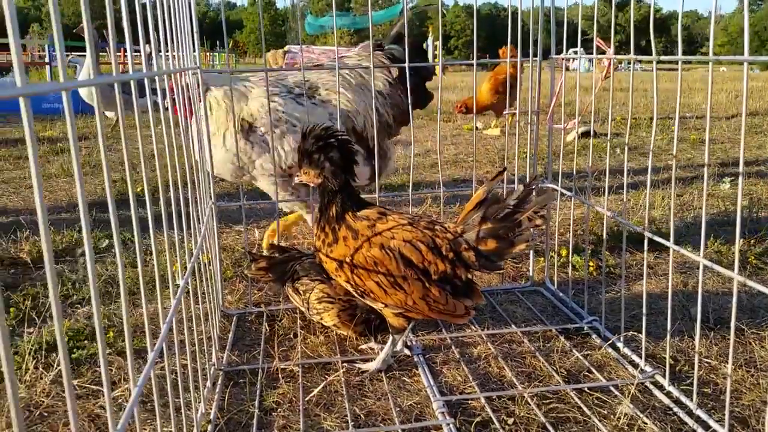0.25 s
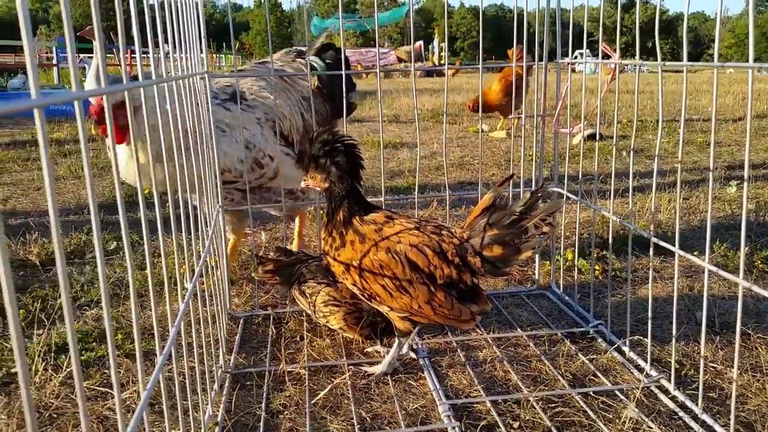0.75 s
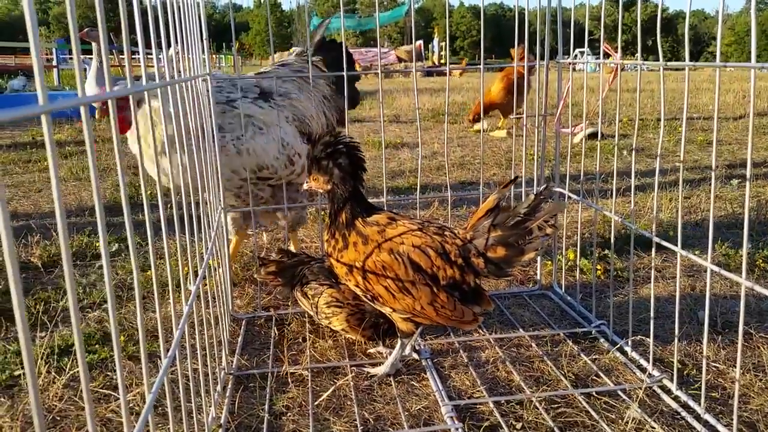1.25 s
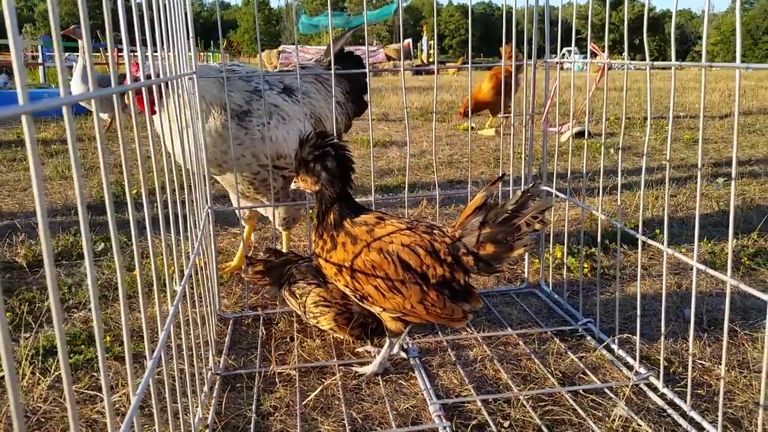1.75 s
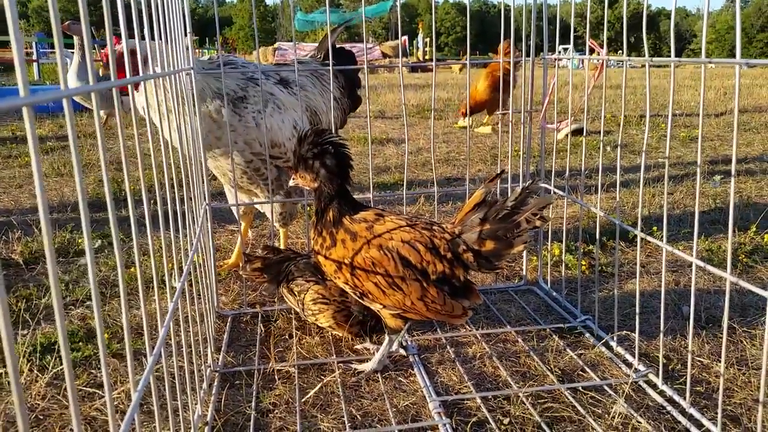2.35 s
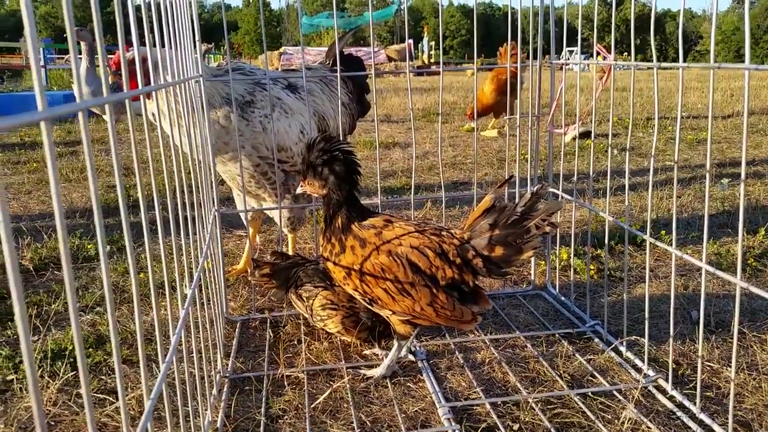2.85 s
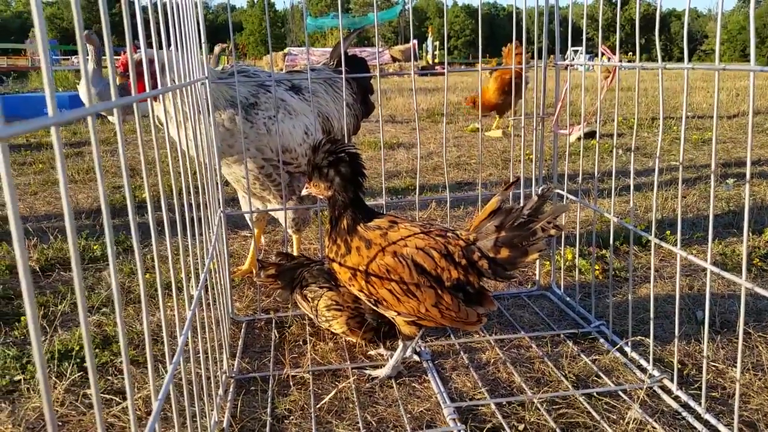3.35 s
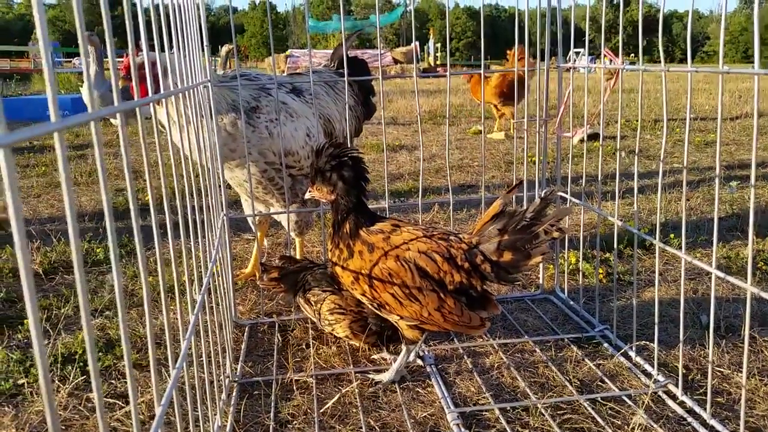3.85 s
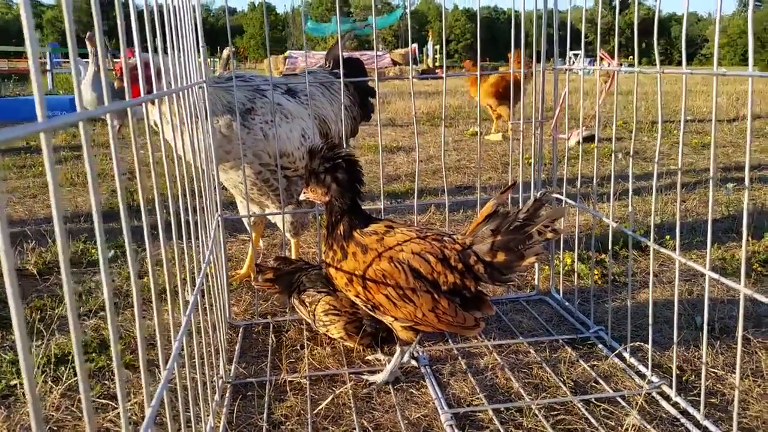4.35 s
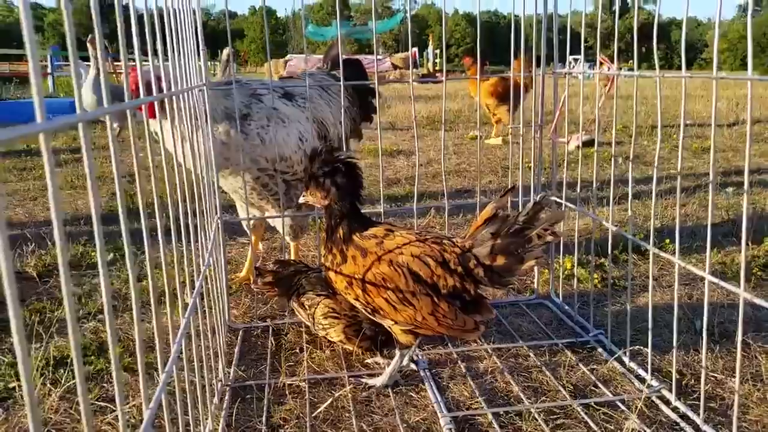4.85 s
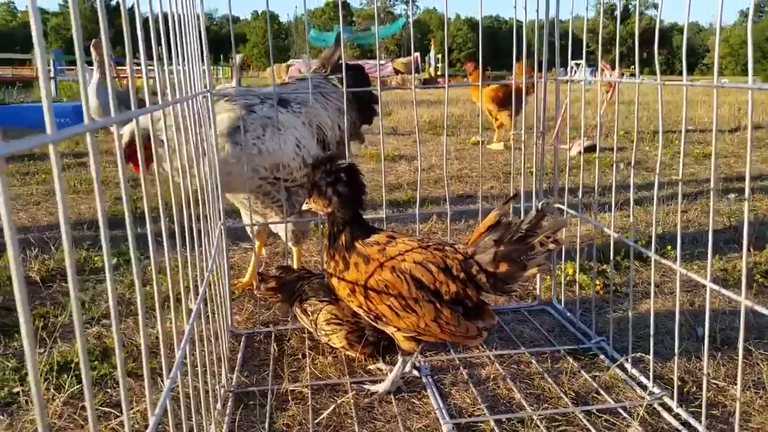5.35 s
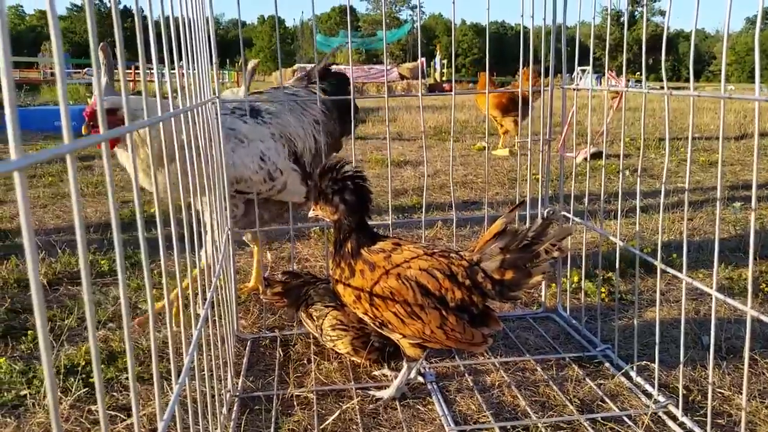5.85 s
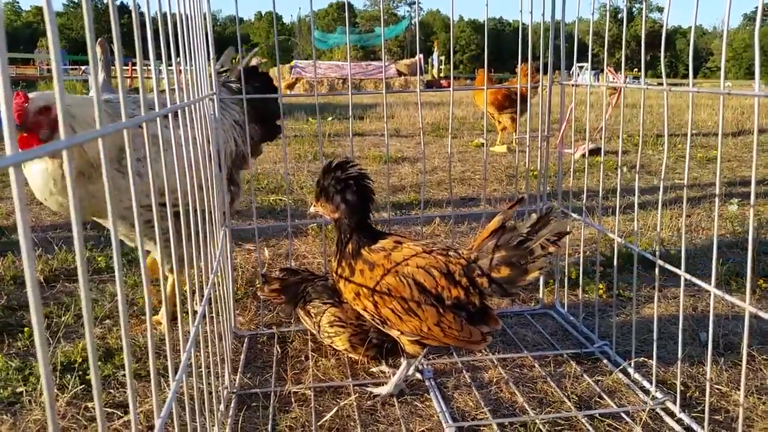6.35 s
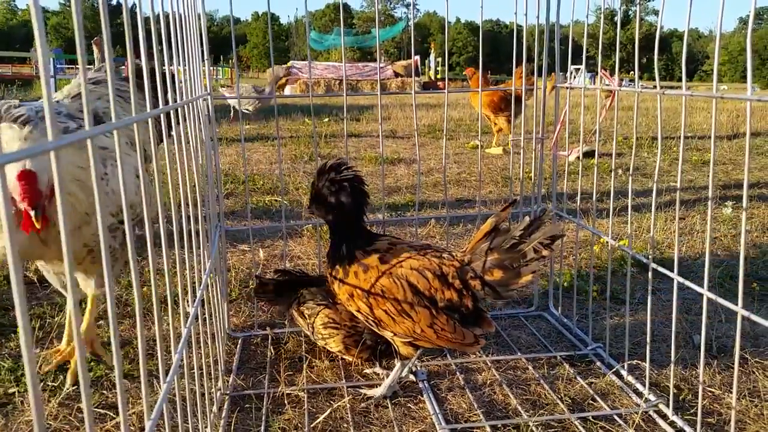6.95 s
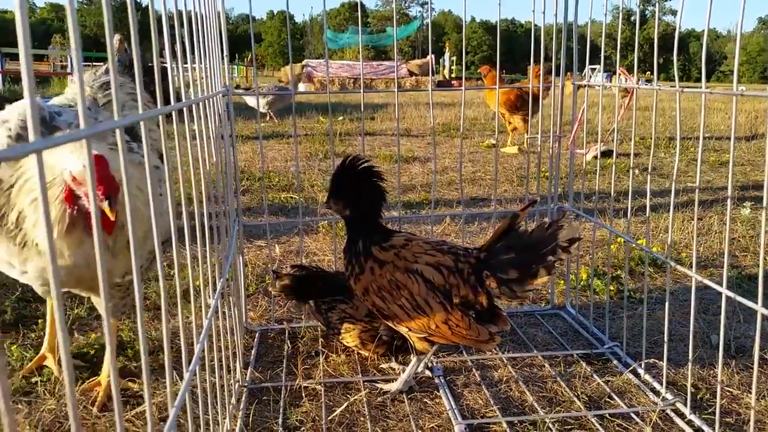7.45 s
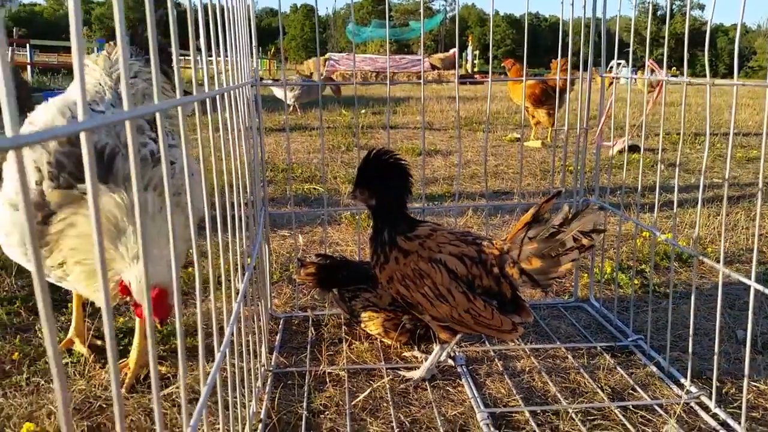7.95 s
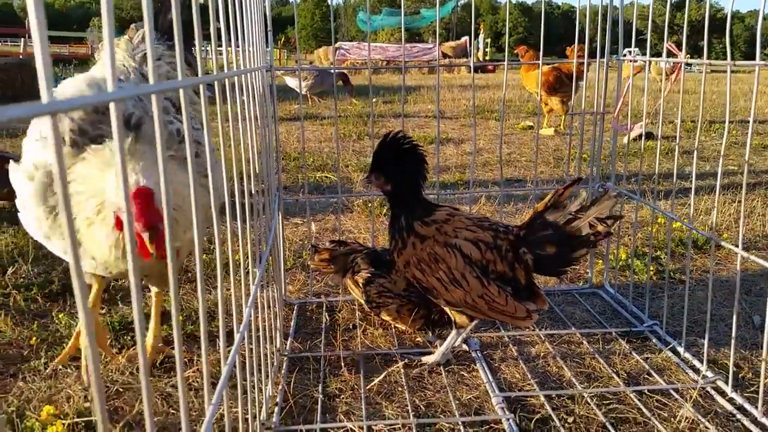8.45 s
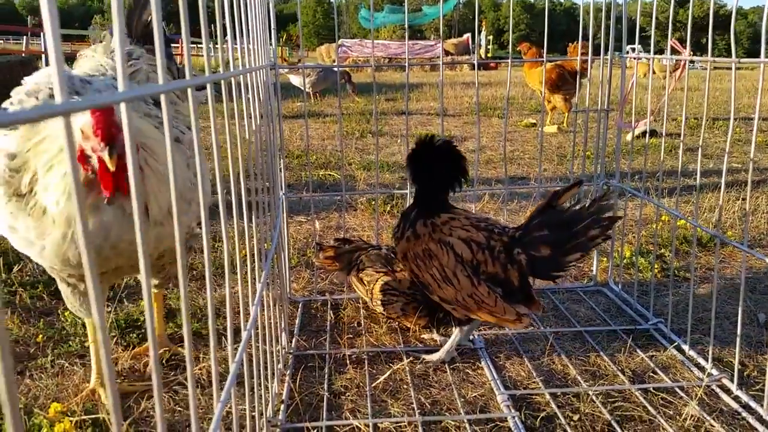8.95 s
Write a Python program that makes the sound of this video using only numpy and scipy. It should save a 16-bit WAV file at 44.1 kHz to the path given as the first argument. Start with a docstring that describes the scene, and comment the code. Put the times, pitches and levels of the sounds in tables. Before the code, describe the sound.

Open summer field beside a wire pen, microphone close to the birds. Soft low breeze, a high insect chorus, fast cricket trills with brief gaps and faint katydid buzzes about twice a second continue throughout; a faint far engine slowly sinks in pitch, clearer after 6.5 s. A rooster gives tiny low throaty clucks at 0.05 and 0.9 s. A second bird, slightly further away, makes quick soft clucking runs at 1.4-2.0, a quieter one at 3.1-3.5, and a stronger one at 4.7-5.3 s, rising and closing with a small squeak. A hard dull knock strikes the microphone at 4.2 s. The rooster clucks at 5.9, 6.95 and 7.55 s; the last run comes at 6.9-7.4 s. Dry grass crackles lightly, mainly around 7 s and 8.7-9.1 s, and low bumps cluster from 6.3 s, stronger at 8.4 s. The loudest, sharpest cluck comes at 8.7 s.

```python
"""A light breeze and insects in the grass of a summer field, and at once a low cluck from a rooster close by at a wire pen.
Filtered noise makes the breeze and the insect chorus, swept tones the crickets, noise in a narrow band a katydid,
and one wavering tone a far engine that sinks in pitch. The rooster's clucks are a few throat pulses each;
a second bird a little further off answers with four quick runs of soft notes, made of harmonics and breath.
Steps crackle in dry grass, and later a few bumps reach the microphone."""
import sys
import numpy as np
from scipy import signal
from scipy.fft import rfft, irfft, next_fast_len
from scipy.io import wavfile
from scipy.ndimage import uniform_filter1d

SR = 44100
rng = np.random.default_rng(int(sys.argv[2]) if len(sys.argv) > 2 else 0)


def put_to_file(sound):
    """Save the sound as 16-bit audio at rate SR, in the file named by the first command-line argument."""
    columns = np.atleast_2d(sound).T  # one column per channel
    safe = np.clip(columns, -1, 1)
    whole_steps = np.round(safe * 32767)
    wavfile.write(sys.argv[1], SR, whole_steps.astype(np.int16))


N = 405860  # samples, 9.2 s

# The high insect hiss over time, which the katydid's buzzes follow. Each row: time in seconds, level in dB.
HISS_LEVEL = [(0, -81.3), (1.9, -81.8), (2.85, -88.3), (3.6, -85), (5.6, -83.3), (6.2, -85.5), (7.3, -78.8),
              (8.35, -84.3), (8.8, -79.5)]


def gain_of(db):
    """Amplitude factor for a level in dB."""
    return 10 ** (np.asarray(db) / 20)


def evened(x):
    """Scales to rms 1."""
    return x / np.sqrt(np.mean(x ** 2) + 1e-20)


def read(points, hz):
    """A spectrum's value at hz, on a log-frequency axis."""
    f, value = np.transpose(points)
    return np.interp(np.log(hz + 1), np.log(f + 1), value)


def curve(rows, order=1):
    """One column of a time table at every sample."""
    rows = np.asarray(rows)
    return np.interp(np.arange(N) / SR, rows[:, 0], rows[:, order])


def panned(x, side_db):
    """Two channels from one, the left louder by side_db."""
    return x * gain_of([[side_db / 2], [-side_db / 2]])


def add(mix, s, sound):
    """Lays a stereo sound into the mix from s seconds on."""
    part = mix[:, max(round(s * SR), 0):][:, :sound.shape[1]]
    part += sound[:, :part.shape[1]]


def wander(hz, size=N):
    """Slow chance of rms 1, up to about hz."""
    n = next_fast_len(size + SR, True)
    f = np.fft.rfftfreq(n, 1 / SR)
    slow = irfft(rfft(rng.standard_normal(n)) / (1 + (f / hz) ** 4), n)
    return evened(slow)[:size]


def coloured(x, colour, size=4096):
    """Causal (minimum-phase) filter whose gain in dB is colour(hz)."""
    hz = abs(np.fft.fftfreq(size, 1 / SR))
    log_gain = np.log(gain_of(colour(hz)))
    ring = np.fft.ifft(np.exp(np.conj(signal.hilbert(log_gain)))).real
    return signal.fftconvolve(x, ring[:size // 2])


def wash(spectrum, likeness, side_db, patchy_db, size=1024):
    """Stereo noise with drifting patches; the mean of both channels has rms 1."""
    hz = np.fft.rfftfreq(size, 1 / SR)
    a, b, c, d, patches = rng.standard_normal((5, N * 4 // size + 5, len(hz)))
    patches = uniform_filter1d(patches, size=6, axis=0)  # over time
    patches = evened(uniform_filter1d(patches, size=7, axis=1))  # over frequency
    same = np.clip(likeness, -1, 1)
    left = a + 1j * b
    right = same * left + np.sqrt(1 - same ** 2) * (c + 1j * d)
    z = np.array([left, right])
    z *= gain_of(read(spectrum, hz) + patchy_db * patches)
    side = side_db(hz) / 2
    z *= gain_of(np.array([side, -side]))[:, None]
    x = signal.istft(z.transpose(0, 2, 1), nperseg=size, noverlap=size - size // 4)[1][:, :N]
    return x / x.mean(0).std()


def yard(x, wet_db, t60):
    """Weak scattered echoes from the ground, the pen and the birds."""
    t = np.arange(SR // 2) / SR
    signs = rng.choice([-1., 1.], (2, len(t)))
    sparse = rng.random((2, len(t))) < 2500 / SR  # 2500 echoes per second
    taps = signs * sparse * (t > .003) * gain_of(-60 * t / t60)
    taps = taps + .5 * taps[::-1]  # each side hears some of the other
    echoes = signal.fftconvolve(x, taps / np.linalg.norm(taps[0]), axes=1)[:, :N]
    return x + gain_of(wet_db) * echoes


def field():
    """Breeze, far insect chorus and high hiss: three noises, each with its own spectrum and slow level."""
    # Spectra of the three. Each row: frequency in Hz, relative level in dB per Hz.
    breeze_spectrum = [(15, -16.5), (30, -1), (55, 0), (110, -2.5), (170, -9.5), (280, -15.5), (400, -19),
                       (600, -24), (1000, -33.5), (1600, -40.5), (2500, -46.5), (4000, -52.5), (7000, -72),
                       (15000, -82)]
    chorus_spectrum = [(2400, -25.5), (3100, -17), (3750, -12), (4050, -4), (4700, 1.5), (5100, -4.5),
                       (5600, -15.5), (6200, -41.5), (7000, -93)]
    hiss_spectrum = [(6500, -21), (8800, -18.5), (9700, -2.5), (10800, -8.5), (12000, 0.5), (13200, 1.5),
                     (14000, -4), (14700, -23), (15600, -17)]
    # Breeze and chorus over time. Each row: time in seconds, level in dB.
    breeze_level = [(0, -52), (1.6, -53.8), (2.9, -54.7), (5.1, -53.2), (6, -54.7), (6.8, -52), (9.2, -53)]
    chorus_level = [(0, -67), (.7, -66.8), (2.5, -72), (4.8, -71.5), (5.15, -69.5), (6.1, -73.5),
                    (7.5, -67.8), (8.2, -70.8), (9.2, -69.8)]
    breeze_side = [(60, 7.7), (120, 11.8), (380, 3.3), (2000, 2)]  # (Hz, left-right dB)
    breeze = wash(breeze_spectrum, 0.36, lambda f: read(breeze_side, f), patchy_db=2.0, size=2048)
    chorus = wash(chorus_spectrum, 0.2, lambda f: 8 + 0 * f, patchy_db=1.33)
    hiss = wash(hiss_spectrum, 0.18, lambda f: 2 + 0 * f, patchy_db=1)
    low = breeze * gain_of(curve(breeze_level))
    return low + chorus * gain_of(curve(chorus_level)) + hiss * gain_of(curve(HISS_LEVEL))


def engine(start_hz=570, sink_octaves_per_s=.042):
    """One far tone that sinks steadily in pitch, wavering in pitch and level."""
    # The far engine over time. Each row: time in seconds, peak level in dB ahead of the wavering.
    drone_level = [(0, -79.5), (1.6, -82), (4.3, -75.5), (5.8, -76), (6.5, -68), (9.2, -68.7)]
    sinking = start_hz * 2 ** (-sink_octaves_per_s * np.arange(N) / SR)
    hz = sinking * (1 + 0.0091 * wander(16.8))
    tone = np.sin(2 * np.pi * np.cumsum(hz) / SR)
    return panned(tone * gain_of(curve(drone_level)) * (1 + .5 * wander(9)), side_db=4)


def wing_strokes(strokes, top_hz, sag_hz, width):
    """The wing sweeps once a stroke; its tone swells, arches with the speed of the file, sinks and stops."""
    u = ((strokes + 0.017 * wander(8) + .5) % 1 - .5) / width
    hz = top_hz - sag_hz * np.clip(u + 0.2, -.75, 1.4) ** 2 + 30 * wander(300)
    swell = np.exp(-u ** 2 - np.minimum(np.maximum(u, 0) ** 6, 30))  # ends faster than it begins
    flicker = gain_of(1.6 * wander(5.9) + wander(200))
    return evened(swell * flicker * np.sin(2 * np.pi * np.cumsum(hz) / SR))


def crickets(fade_s=.07, far_db=-92):
    """Two crickets trill out of step; the trills drop out briefly. Others, near 7880 Hz, are blurred by distance."""
    # The wings of each cricket, by name: unevenness in strokes, top pitch in Hz,
    # sag in Hz at one stroke width from the top, stroke width in strokes, left-right in dB.
    wings = {"near": (.03, 8067, 329, .16, 4.5), "second": (.17, 8010, 447, .13, 7)}
    # Trills at a steady rate. Each row: cricket, first stroke in seconds, end in seconds,
    # strokes per second, level in dB.
    trills = [("near", .005, 1.62, 15.68, -76.5), ("near", 2.08, 5.86, 15.79, -76.7),
              ("near", 6.219, 6.86, 15.9, -74.5), ("near", 7.0, 9.3, 16.05, -73),
              ("second", 0, 2.95, 14.6, -81.5), ("second", 3.1, 5.8, 14.6, -89),
              ("second", 6.4, 9.3, 14.6, -78.5)]
    t, near = np.arange(N) / SR, np.zeros((2, N))
    for who, start, end, rate, db in trills:
        uneven, top_hz, sag_hz, width, side_db = wings[who]
        strokes = rate * (t - start) + uneven * wander(1)
        singing = np.clip(np.minimum(t - start, end - t) / fade_s + .5, 0, 1)
        voice = singing * wing_strokes(strokes, top_hz, sag_hz, width)
        near += panned(gain_of(db) * voice, side_db)
    far = np.array([wander(300) * np.sin(2 * np.pi * 7880 * t) for _ in range(2)])
    return yard(near, wet_db=-11, t60=0.14) + gain_of(far_db) * evened(far)


def cluck(length, db, first_hz, last_hz, beak_hz, beak_db, bright_db, beak_width_hz=135, swell=0.32,
          first_size=0.23, opening_hz=260):
    """A handful of slowing pulses, swelling and then cut off, ring the throat and beak, after a 5 ms lead."""
    # The rooster's throat. Each row: frequency in Hz, gain in dB.
    rooster_throat = [(60, -22), (170, 2.5), (250, 3), (400, -3), (520, -2), (900, -7), (1080, -3.5),
                      (1320, -25.5), (1540, -27.5), (1700, -33.5), (1860, -29), (2150, -49), (2700, -33.5),
                      (4300, -55), (9000, -84)]
    t, lead = np.arange(int(length * SR)) / SR, SR // 200
    hz = last_hz + (first_hz - last_hz) * (1 - t / length) ** 1.21
    turns = np.cumsum(hz) / SR
    at = np.searchsorted(turns, np.arange(int(turns[-1]) + 1))  # one pulse a turn
    at = at[at < len(t) * .93]
    sizes = np.minimum(first_size + t[at] / length / swell, 1)
    pulses = np.zeros(lead + len(t))
    pulses[lead + at] = sizes * gain_of(.5 * rng.standard_normal(len(at)))
    # the membranes open gradually before each snap, so the lows of a pulse come first
    r = np.exp(-2 * np.pi * opening_hz / SR)
    pulses = signal.lfilter([r, -1], [1, -r], pulses[::-1])[::-1]

    def colour(f):
        """Throat, beak resonance and brightness in dB."""
        beak = beak_db / (1 + ((f - beak_hz) / beak_width_hz) ** 2)
        return read(rooster_throat, f) + beak + bright_db * np.log2(np.clip(f, 250, 3000) / 700)

    voice = coloured(pulses, colour)
    return gain_of(db) * voice / np.sqrt(np.sum(voice ** 2) / len(t))


def rooster():
    """The low clucks close to the microphone, each a short train of throat pulses."""
    # Each row: start in seconds, length in seconds, level in dB, first pitch in Hz, last pitch in Hz,
    # beak resonance in Hz, its boost in dB, brightness in dB per octave, left-right in dB.
    clucks = [(0.049, .013, -44.5, 289, 207.8, 760, 4.5, -1, 3),
              (0.8826, 0.017, -38.5, 304, 218, 770, 0.5, 1, 2),
              (5.9071, 0.0225, -40.5, 293, 232, 756, -1.5, 2, 1.5),
              (6.9528, .017, -37, 282, 203, 714, 7, 0.5, 3), (7.535, .030, -49, 338, 285, 680, 4, -6, 4.5),
              (7.5623, .039, -35, 264, 205, 730, 6, -2.5, 3),
              (8.7259, 0.02, -27, 280, 260.3, 790, 15.5, 0.5, 2)]
    out = np.zeros((2, N))
    for s, *shape, side_db in clucks:
        add(out, s - .005, panned(cluck(*shape), side_db))  # less the 5 ms lead
    return out


def katydid(length=.2, over_hiss_db=2.8):
    """Short buzzes of noise near 9850 Hz, about twice a second, swell and sink with the high hiss."""
    # The middle of each buzz in seconds.
    buzz_times = [.22, 1.0, 1.48, 2.1, 2.56, 3.06, 3.48, 4.1, 4.8, 5.17, 5.77, 6.24, 6.8, 7.31, 8.16, 8.82]
    out, n = np.zeros((2, N)), int(length * SR)
    band = lambda f: -np.minimum(((f - 9850) / 260) ** 2, 60)
    for s in buzz_times:
        rasp = [coloured(row, band)[:n] for row in rng.standard_normal((2, n))]
        add(out, s - length / 2, evened(np.array(rasp)) * signal.windows.tukey(n, .5))
    return out * gain_of(curve(HISS_LEVEL) + over_hiss_db)


def note(hz, throat, bright_db, jitter, rough):
    """Harmonics on a trembling pitch, with a puff of air in each cycle; rms 1."""
    turns = np.cumsum(hz * (1 + jitter * wander(210, size=len(hz)))) / SR
    colour = lambda f: read(throat, f) + bright_db * np.log2(np.clip(f, 500, 1400) / 500)
    k = np.arange(1, 14)[:, None]  # harmonic numbers
    tone = (gain_of(colour(k * hz)) * np.cos(2 * np.pi * k * turns)).sum(0)
    puffs = rng.standard_normal(len(hz)) * np.exp(-2 * (turns % 1))
    air = coloured(puffs, colour)[:len(hz)]
    return evened(evened(tone) + rough * evened(air))


def soft_note(s, db, hz, bright_db, rasp_db, length=.044, stretch=.15, scoop=.22, rise=.12, lead=.47):
    """Starts thin and high, breaks down onto its full pitch, lifts a little and fades; louder ones last longer."""
    # The second bird's throat. Each row: frequency in Hz, gain in dB.
    hen_throat = [(200, -28), (530, 5.5), (800, 3), (1020, -6), (1200, 3.5), (1530, -13), (1720, -19.5),
                  (2050, -22), (2600, -36.5), (3020, -19), (3500, -22.5), (4350, -19), (6000, -41),
                  (9000, -57)]
    span = length * gain_of(stretch * (db + 52))  # seconds; length holds at -52 dB
    u = np.linspace(0, 1, int(span * SR))
    swell = np.interp(u, [0, .1, .25, .34, .6, .85, 1], [0, .18, .28, 1, .7, .14, 0])
    pitch = hz * (1 + rise * (u - .45) + scoop / (1 + np.exp((u - .25) / 0.023)))
    throat = [(f, level + rasp_db * (f > 1900)) for f, level in hen_throat]
    voice = note(pitch, throat, bright_db, jitter=.028, rough=.45)
    return s - lead * span, panned(gain_of(db) * swell * voice, side_db=1)


def squeak(s, span, db, first_hz, last_hz):
    """A thin glide of harmonics and breath centred on s."""
    # Colour of a squeak. Each row: frequency in Hz, gain in dB.
    squeak_colour = [(400, -28), (700, -3), (1250, 2.5), (1480, -7), (2000, -16), (2600, -34), (3200, -13),
                     (6000, -39)]
    pitch = np.linspace(first_hz, last_hz, int(span * SR))
    voice = note(pitch, squeak_colour, 0, jitter=0.022, rough=0.25)
    voice = voice * signal.windows.tukey(len(pitch), .6)
    return s - span / 2, panned(gain_of(db) * voice, side_db=3)


def hen(level_db=.7):
    """Runs open with a falling squeak, climb on an even beat to the loudest note, close with a rising squeak."""
    # Runs of soft notes; level_db is added to all levels. Each row: first note in seconds, beat in seconds,
    # closing note in seconds, pitch in Hz, first note in dB, loudest note in dB, closing note in dB,
    # climb in dB per note, dip of the off-beats in dB, brightness of the loudest note in dB per octave,
    # rasp above 1900 Hz in dB.
    runs = [(1.417, .1, 2.046, 514, -57.5, -50, -59.5, 2.4, 1.5, 4, -1),
            (3.138, .105, 3.545, 511, -61, -54, -56.5, 1.8, 0, 3.5, -3),
            (4.72, .1025, 5.333, 503, -54.5, -44.7, -56, 1.4, 5, 1.3, -2),
            (6.917, .105, 7.438, 552, -49, -47.5, -53, 3.6, 0, -.5, 5)]
    # Squeaks leading into the outer notes: lead in seconds, length in seconds, level against the note in dB,
    # first pitch in Hz, last pitch in Hz.
    opening_squeak = (.008, .044, -14.5, 695, 558)
    closing_squeak = (.012, .054, -6.5, 612, 783)
    # Faint whines before the last run; level_db is added. Each row: middle in seconds, length in seconds,
    # level in dB, first pitch in Hz, last pitch in Hz.
    whines = [(6.65, .04, -77, 597, 550), (6.775, .051, -73, 557, 597)]
    first_beat = .82  # in beats: the step after the first note is short
    brighten_db, closing_bright_db = 1.1, 5.5  # dB per octave: gained with each note; of the closing note
    opening_hz, closing_hz = 494, 515
    out = np.zeros((2, N))
    for start, beat, end, hz, first_db, top_db, last_db, climb_db, dip_db, bright_db, rasp_db in runs:
        times = np.arange(start + first_beat * beat, end - first_beat * beat, beat)
        add(out, *soft_note(start, first_db, opening_hz, bright_db - brighten_db * len(times), rasp_db))
        for to_go, s in enumerate(times[::-1]):  # back from the loudest note
            db = top_db - climb_db * to_go - dip_db * (to_go % 2)
            add(out, *soft_note(s, db, hz, bright_db - brighten_db * to_go, rasp_db))
        add(out, *soft_note(end, last_db, closing_hz, closing_bright_db, rasp_db))
        outer = [(start, first_db, opening_squeak), (end, last_db, closing_squeak)]
        for s, note_db, (lead, span, db, *glide) in outer:
            add(out, *squeak(s - lead, span, note_db + db, *glide))
    for row in whines:
        add(out, *squeak(*row))
    return gain_of(level_db) * out


def steps(snaps_per_s=900, spread_db=4):
    """Steps in dry grass: blades snap at random underfoot, in clumps that swell and fade."""
    # Each row: middle in seconds, length in seconds, level in dB.
    footfalls = [(1.76, 0.22, -81.5), (5.232, 0.12, -84), (6.91, 0.24, -77.5), (7.187, 0.12, -77.5),
                 (8.738, 0.069, -73.5), (8.857, .05, -89), (9.12, 0.035, -76.5)]
    # Colour of dry grass. Each row: frequency in Hz, gain in dB.
    grass = [(1500, -21), (4000, -2), (7000, -9.5), (10500, -9), (11800, -4), (13000, 1.5), (15500, -10)]
    out = np.zeros((2, N))
    for s, length, db in footfalls:
        n = int(length * SR)
        snaps = rng.random((2, n)) < snaps_per_s / SR
        sizes = gain_of(spread_db * np.minimum(rng.exponential(1, (2, n)), 4))
        snaps = snaps * sizes * np.hanning(n)
        both = snaps + .5 * snaps[::-1]  # each side hears some of the other
        crackle = np.array([coloured(row, lambda f: read(grass, f)) for row in both])
        add(out, s - length / 2, gain_of(db) * evened(crackle))
    return out


def small_bumps(count=3, from_s=6.25, to_s=6.75, db=-44.5, low_hz=70, high_hz=165, knock_db=-14, side_db=17):
    """Weaker low bumps, like puffs of wind, scattered at random from 6.25 to 6.75 s, at either port."""
    rows = []
    for k, (when, pitch, side) in enumerate(rng.random((count, 3))):
        s = from_s + (to_s - from_s) * (k + when) / count
        hz = low_hz + (high_hz - low_hz) * pitch
        rows.append((s, db, hz, knock_db, side_db * np.sign(side - .5)))
    return rows


def bumps(knock_hz=470, knock_width=0.00032, scuff_db=-23, scuff_t60=0.097, tick_db=-23, cycles=5.6):
    """A dull knock with a faint tick, a quickly damped low swing and a muffled scuff, mostly at one microphone port."""
    # Bumps on the microphone. Each row: start in seconds, level in dB, pitch of the swing in Hz,
    # dull knock against the swing in dB, left-right in dB.
    hits = [(4.2245, -26.5, 118, 5.5, 16.5), (4.2325, -31.5, 51.4, -10, 17), (5.765, -47.5, 300, 7, 2),
            (6.385, -35.5, 75, -30, -18), (6.503, -38, 153, -12, 16.5), (6.765, -41.5, 72, -20, -17),
            (7.382, -41.5, 84, -27, 26), (7.3141, -34, 160, -28, 25), (7.513, -40, 118, 6, 7.5),
            (7.792, -42, 153, -17, 23), (8.039, -36, 96, -27, 20.5), (8.422, -32, 50, -28.5, 16),
            (8.4436, -30.5, 173, 1.5, 26.5), (8.998, -34.5, 89, -32, 15)]
    # The cage wire hums from the hardest bump on: level in dB, pitch in Hz, time to fall 60 dB in seconds.
    wire = (-50, 250, 0.57)
    out, t = np.zeros((2, N)), np.arange(SR // 3) / SR
    muffle = signal.butter(N=4, Wn=knock_hz * 1.3, fs=SR, output="sos")
    u = t / knock_width
    blow = u * np.exp(1 - u) * np.sin(2 * np.pi * knock_hz * t)
    knock = signal.sosfilt(muffle, blow) + gain_of(tick_db) * blow  # the unmuffled part is the tick
    for s, db, hz, knock_db, side_db in hits + small_bumps():
        decay = gain_of(-60 * t * hz / cycles)  # falls 60 dB in that many swings
        swing = np.sin(2 * np.pi * hz * t) * decay * (1 - np.exp(-u))
        scuff = evened(signal.sosfilt(muffle, rng.standard_normal(len(t))))
        scuff = scuff * gain_of(scuff_db - 60 * t / scuff_t60)
        bump = swing + gain_of(knock_db) * (knock + scuff)
        add(out, s, panned(gain_of(db) * bump, side_db))
    db, hz, t60 = wire
    hardest_s = max(hits, key=lambda row: row[1] + row[3])[0]  # by the level of its knock
    hum = gain_of(db - 60 * t / t60) * np.sin(2 * np.pi * hz * t)
    add(out, hardest_s, panned(hum, side_db=15.5))
    return out


def scene():
    """The field, the insects, the engine, both birds with their echoes, the steps and the bumps together."""
    birds = yard(rooster(), wet_db=-17, t60=0.059) + yard(hen(), wet_db=-10.5, t60=0.2)
    return birds + bumps() + steps() + crickets() + katydid() + field() + engine()


def record(dry, edge_hz=15700):
    """The recorder's band limit: a steep low-pass."""
    low_pass = signal.firwin(511, edge_hz, window=("kaiser", 9), fs=SR)
    return signal.oaconvolve(dry, low_pass[None], "same")


dry = scene()
out = record(dry)
put_to_file(out)
```